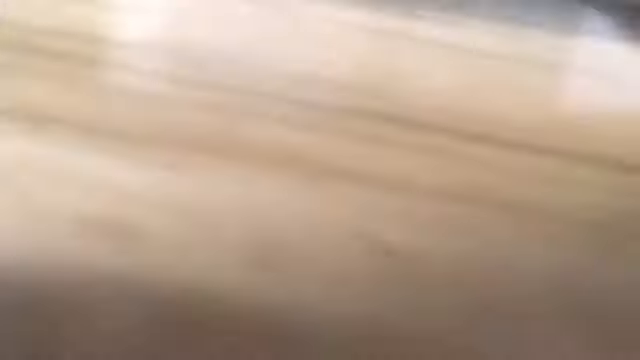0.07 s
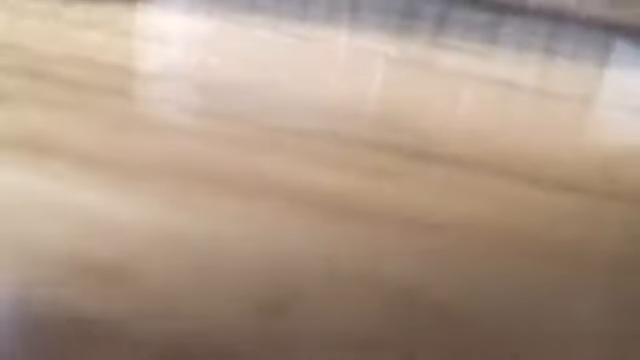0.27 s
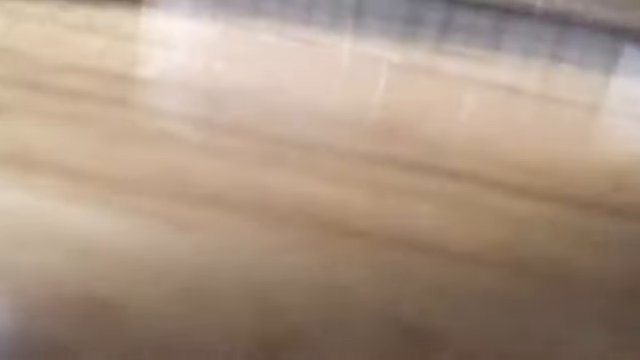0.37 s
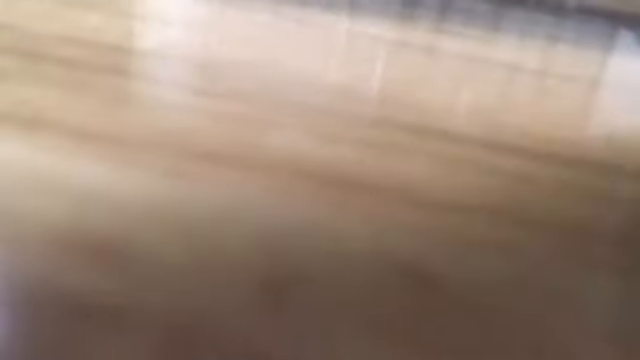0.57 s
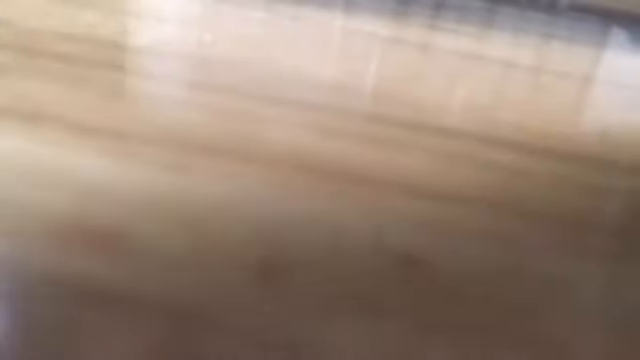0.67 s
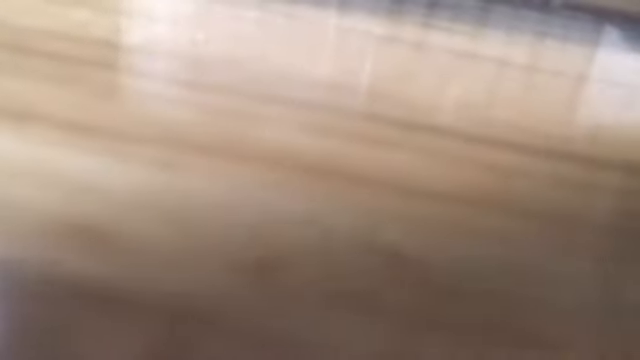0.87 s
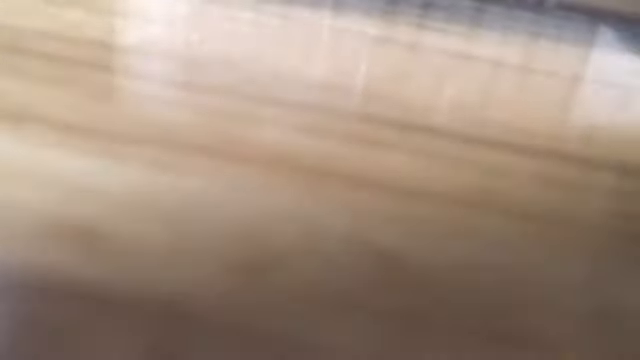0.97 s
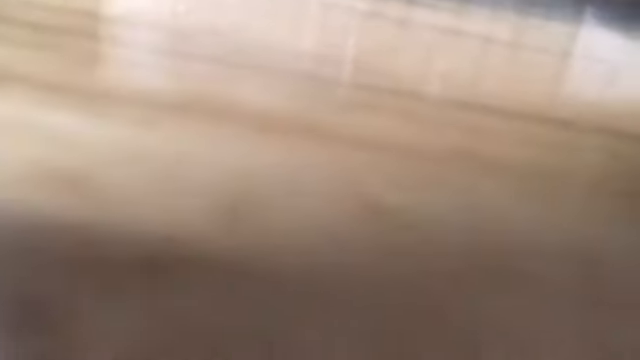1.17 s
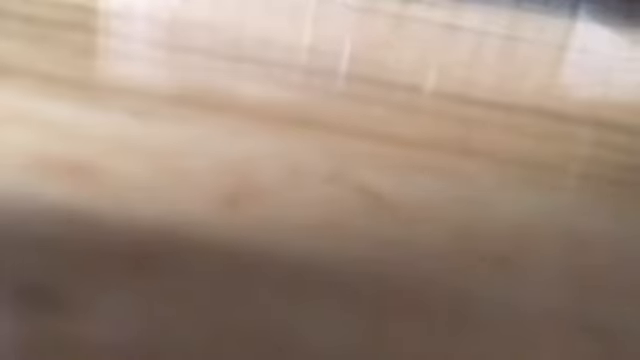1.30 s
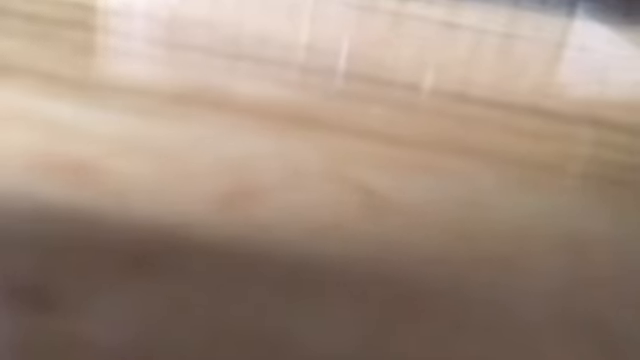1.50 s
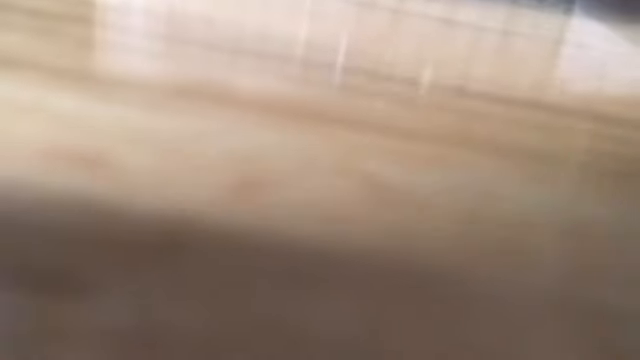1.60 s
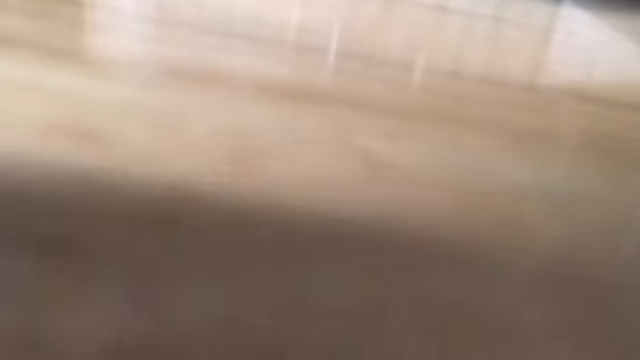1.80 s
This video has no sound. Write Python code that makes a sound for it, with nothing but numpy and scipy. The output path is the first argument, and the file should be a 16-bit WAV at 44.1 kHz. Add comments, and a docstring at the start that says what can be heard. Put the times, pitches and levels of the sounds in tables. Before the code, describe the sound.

A sharp close knock on a wooden board, then a duller thump, in a quiet room.

```python
"""A wooden board is knocked close by in a quiet room: a sharp knock with a rebound, then a duller thump.
Each blow excites heavily damped modes; the softer the contact, the less treble it supplies.
A faint slide leads in; a low echo, soft handling bumps and a tiny falling squeak follow. Blows and bumps
reverberate weakly over a low room rumble, a faint machine hum and microphone hiss."""
import sys
import numpy as np
from scipy import signal
from scipy.fft import rfft, irfft, next_fast_len
from scipy.io import wavfile
from scipy.ndimage import map_coordinates

SR = 44100
rng = np.random.default_rng(int(sys.argv[2]) if len(sys.argv) > 2 else 0)


def pcm_store(signal):
    """Save signal as 16-bit PCM."""
    levels = np.round(np.clip(np.atleast_2d(signal), -1, 1) * 32767)
    wavfile.write(sys.argv[1], SR, levels.astype(np.int16).T)


N = 81585


def amp(db):
    """Decibels to amplitude ratio."""
    return 10 ** (np.asarray(db) / 20)


def along(points, hz):
    """Interpolation of (Hz, value) points on a logarithmic frequency axis."""
    freqs, values = np.transpose(points)
    return np.interp(np.log(hz + 1), np.log(freqs + 1), values)


def since(start):
    """Seconds since start, zero before it."""
    return np.maximum(np.arange(N) / SR - start, 0)


def fade(t, t60):
    """Exponential decay by 60 dB in t60 seconds, silent until t leaves zero."""
    return (t > 0) * np.exp(-np.log(1000) * t / t60)


def filtered(x, response):
    """Linear filtering: the spectrum of x times a frequency response."""
    size = next_fast_len(N + SR // 2)
    return irfft(rfft(x, size) * response(np.fft.rfftfreq(size, 1 / SR)), size)[:N]


def noise(spectrum):
    """White noise shaped by (Hz, dB) points and scaled to rms 1."""
    x = filtered(rng.standard_normal(N), lambda hz: amp(along(spectrum, hz)))
    return x / x.std()


def wobble(rate):
    """A smooth random curve with rate knots a second."""
    return map_coordinates(rng.standard_normal(int(N * rate / SR) + 4), [np.arange(N) * rate / SR])


def board_response(hz):
    """Modal superposition: damped resonances add, neighbours with opposite signs."""
    # Each row: mode frequency in Hz, peak gain in dB, bandwidth in Hz.
    modes = [(150.2, 2.06, 106.6), (208.6, 1.6, 261), (478, -1.27, 342), (703, -16.5, 66),
             (941, -9.5, 271.8), (1044.5, -5, 158), (1330, -7.5, 79), (1881, -6, 390), (2003, -3.5, 200),
             (2264, -10, 64), (2293, -6, 284.5), (2840, -12.5, 410)]
    return sum((-1) ** k * amp(db) * 1j * hz * width / (centre ** 2 - hz ** 2 + 1j * hz * width)
               for k, (centre, db, width) in enumerate(modes))


def knocks():
    """Impact excitation: a force pulse rings the board. Soft contact is dull, hard contact clicks."""
    # Each row: start in seconds, force in dB, contact cutoff in Hz, click level in dB.
    blows = [(.2300, 30.5, 547.4, -30.5), (0.2364, 25.5, 324, -42.5), (0.247, 10.5, 300, -66),
             (0.5429, 21.5, 299, -58.5), (0.548, 18.5, 205, -68), (0.5568, -2, 343.3, -68)]  # three contacts for the knock, three for the thump
    # Brief, diffuse low ringing of early reflections. Each row: frequency in Hz, relative level in dB.
    reflection_spectrum = [(50, 2), (170, 4.5), (400, 4.5), (620, 2.5), (720, -2), (920, -5), (1200, -15),
                           (2200, -27), (3200, -29.5), (6000, -44), (15000, -47)]
    # The contact click. Each row: frequency in Hz, relative level in dB.
    click_spectrum = [(500, -17), (2000, -0.5), (3100, -12), (3700, 8.5), (4350, -2), (5000, -10),
                      (5900, 5), (7000, -15), (8200, -5.5), (10500, -9.5), (14000, -8), (16000, -0.5)]
    out = np.zeros(N)
    for start, force_db, cutoff_hz, click_db in blows:
        t = since(start)
        impulse = signal.unit_impulse(N, round(start * SR))
        ring = filtered(impulse, lambda hz: board_response(hz) / (1 + 1j * hz / cutoff_hz) ** 2)
        reflections = noise(reflection_spectrum) * fade(t, t60=0.043867) * (1 - np.exp(-t / 0.0088))
        click = noise(click_spectrum) * fade(t, t60=0.0073)
        out += amp(force_db) * (ring + amp(-51.5) * reflections) + amp(click_db) * click
    return out


def bumps_and_echo():
    """Damped oscillation: low tones with a little noise form the handling bumps and a faint echo."""
    # Each row: start in seconds, level in dB, pitch in Hz, 60 dB decay time in seconds.
    events = [(.211, -41, 136.5, 0.17), (.289, -46, 433, 0.1), (.644, -36.5, 285, 0.047),
              (1.191, -31, 310, .038), (1.233, -29, 258, 0.032), (1.273, -45, 314, 0.069),
              (1.815, -48.5, 272, 0.11)]  # the second row is the echo, about 60 ms after the knock
    # Each row: frequency in Hz, relative level in dB.
    noise_spectrum = [(100, -3), (300, 4), (460, -8), (680, -20), (950, -18), (1500, -31.5), (5000, -38.5)]
    rise_s = 0.0035
    out = np.zeros(N)
    for start, db, hz, t60 in events:
        t = since(start)
        body = np.sin(2 * np.pi * hz * t) + amp(-10) * noise(noise_spectrum)
        out += amp(db) * body * fade(t, t60) * (1 - np.exp(-t / rise_s))
    return out


def slide():
    """Sliding friction: a light hissing rub catches once and sinks to a trace after the knock."""
    # Each row: time in seconds, level in dB.
    rub_levels = [(0, -64.5), (.05, -65), (.1, -59.5), (.18, -60), (.205, -62), (.23, -67), (.3, -76.5)]
    # Each row of both spectra: frequency in Hz, relative level in dB.
    rub_spectrum = [(200, -3), (900, -0.5), (1600, -6.5), (3000, -2), (5000, -5.5), (7000, -1.5),
                    (10500, -2), (13500, 2), (16000, -6.5)]
    catch_spectrum = [(400, -24.5), (900, 9.5), (2800, 2), (4500, -16.5), (12000, -33)]
    rub = amp(np.interp(since(0), *np.transpose(rub_levels))) * noise(rub_spectrum)
    t = since(0.083)
    catch = noise(catch_spectrum) * fade(t, t60=0.11) * (1 - np.exp(-t / 0.0047))
    return rub + amp(-56) * catch


def squeak():
    """Frequency modulation: jitter roughens a thin tone whose pitch drops and settles."""
    end_hz, drop_hz, jitter_hz = 5431, 1000, 70.38
    glide_s, length_s = 0.008, 0.04478
    t = since(1.769)
    hz = end_hz + drop_hz * np.exp(-t / glide_s) + jitter_hz * wobble(rate=540)
    swell = np.sin(np.pi * np.minimum(t / length_s, 1))
    return amp(-71.5) * swell * np.sin(2 * np.pi * np.cumsum(hz) / SR)


def room(x):
    """Reverberation: convolution with a noise tail in which each frequency decays at its own rate."""
    # Each row: frequency in Hz, reverberation time in seconds.
    decay_times = [(100, 0.1281), (500, 0.36), (2000, 0.3027), (10000, 0.04643)]
    # Each row: frequency in Hz, gain in dB.
    colour = [(60, -16), (250, -2.5), (500, -2), (1000, -7.5), (3000, -1.5), (12000, -16)]
    freqs, t, spectra = signal.stft(rng.standard_normal(SR // 2), SR, nperseg=256)
    spectra = spectra * fade(t, along(decay_times, freqs)[:, None])
    tail = signal.istft(spectra, SR, nperseg=256)[1]
    wet = signal.fftconvolve(x, tail / np.linalg.norm(tail))[:N]
    return filtered(wet, lambda hz: amp(along(colour, hz)))


def background():
    """Line and continuous spectra: a machine's wavering hum over room rumble and microphone hiss."""
    # Each row: frequency in Hz, rms level in dB.
    hum_lines = [(58.3, -60.5), (117, -66), (238, -73), (355, -74.5), (560, -77.5), (592, -82), (1121, -81),
                 (1416, -89), (6616, -89.5)]
    # Each row: time in seconds, level in dB.
    rumble_levels = [(0, -59), (.38, -61), (.8, -58), (1.85, -58)]
    # Each row of both spectra: frequency in Hz, relative level in dB.
    rumble_spectrum = [(22, -34), (32, -18.5), (42, -5), (56, 0), (80, -9), (122, -3.5), (160, -11.5),
                       (200, -18.5), (350, -20.5), (440, -28), (600, -30.5), (780, -47), (1300, -90)]
    hiss_spectrum = [(350, -44), (600, -5), (748, -6.5), (970, -8), (1050, -8), (1140, -10), (1290, -9.5),
                     (1410, -11.5), (1780, -15.5), (2070, -11), (4910, -18), (6370, -17), (7730, -20.5),
                     (13900, -16), (16000, -16)]
    waver_rad = 0.7167
    t = since(0)
    hum = sum(amp(db) * np.sqrt(2) * np.sin(2 * np.pi * hz * t + waver_rad * wobble(rate=6.0121))
              for hz, db in hum_lines)
    rumble = amp(np.interp(t, *np.transpose(rumble_levels))) * noise(rumble_spectrum)
    return rumble + amp(-70) * noise(hiss_spectrum) + hum


def scene():
    """Superposition: all sources add in one channel; only knocks, bumps and echo reverberate."""
    hits = knocks() + bumps_and_echo()
    return (hits + amp(-24.5) * room(hits) + slide() + squeak() + background())[None]


def record(dry):
    """Band limiting: a steep low-pass filter removes the highest treble."""
    cutoff_hz = 15800
    return filtered(dry[0], lambda hz: 1 / np.sqrt(1 + (hz / cutoff_hz) ** 300))[None]


dry = scene()
out = record(dry)
pcm_store(out)
```